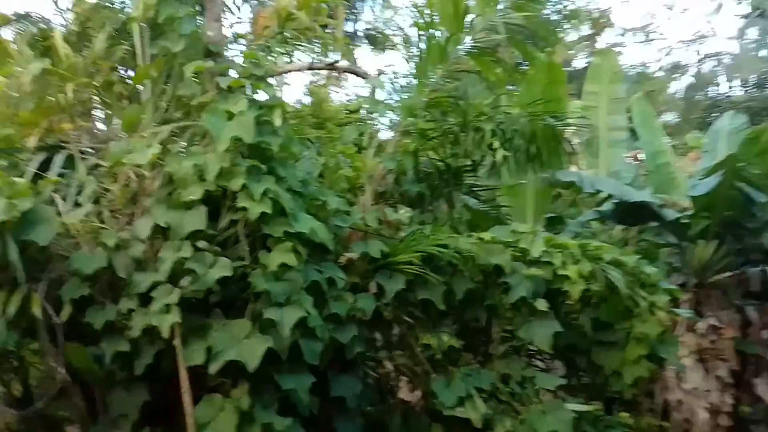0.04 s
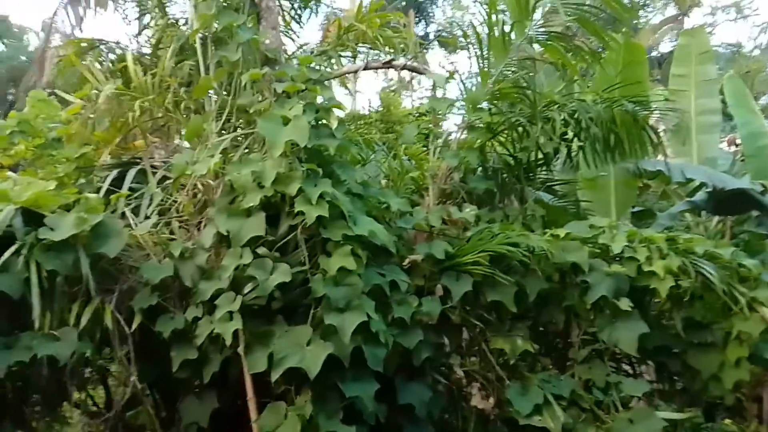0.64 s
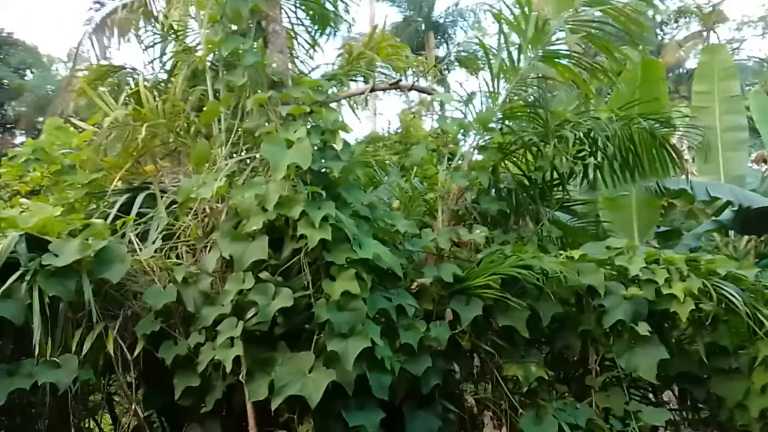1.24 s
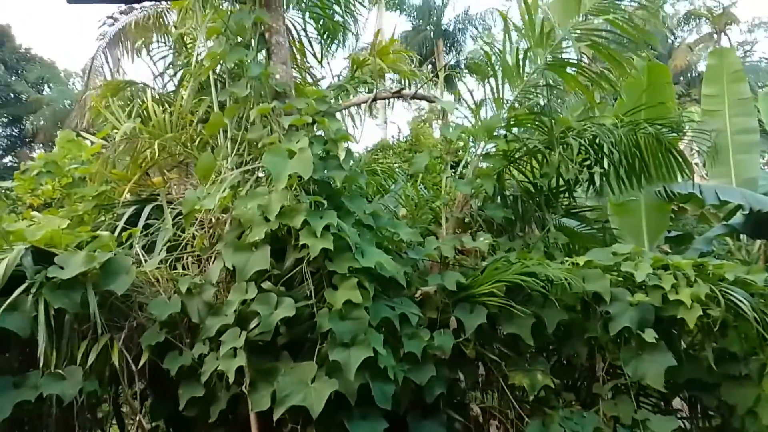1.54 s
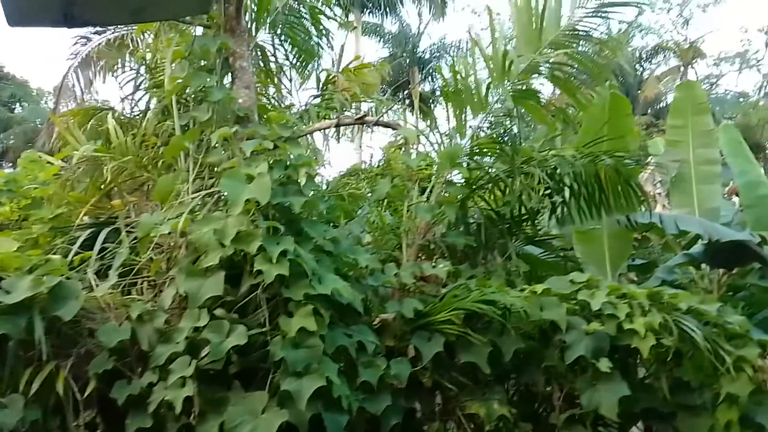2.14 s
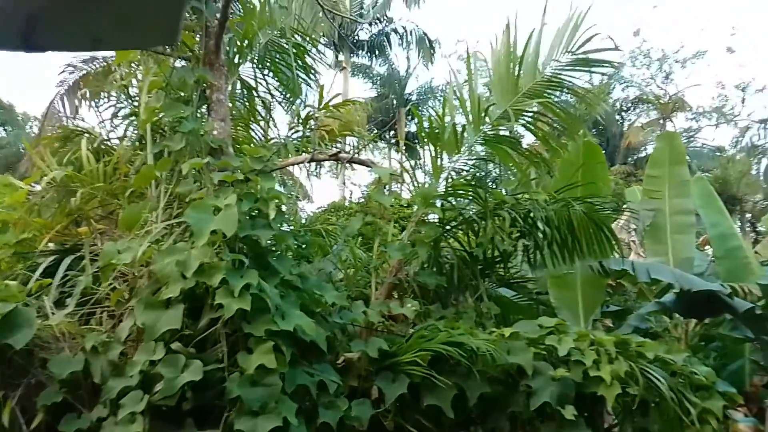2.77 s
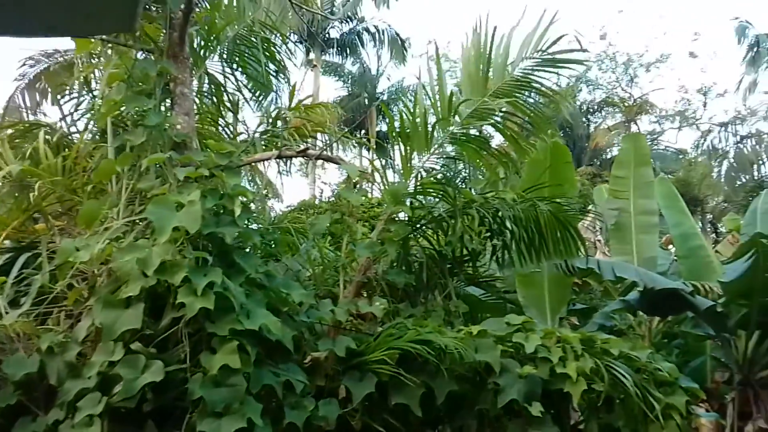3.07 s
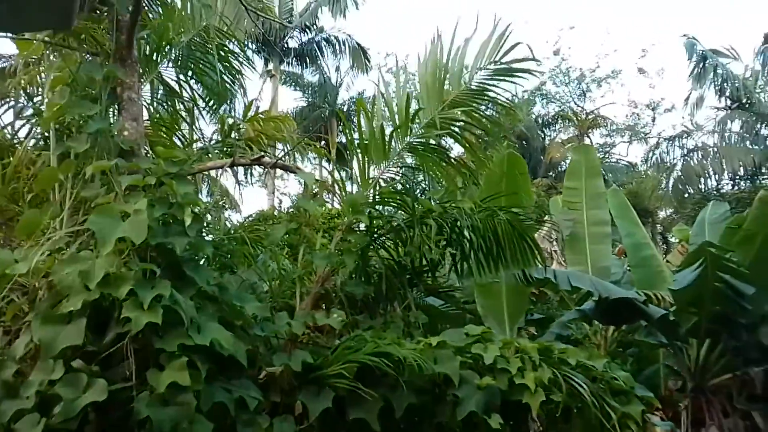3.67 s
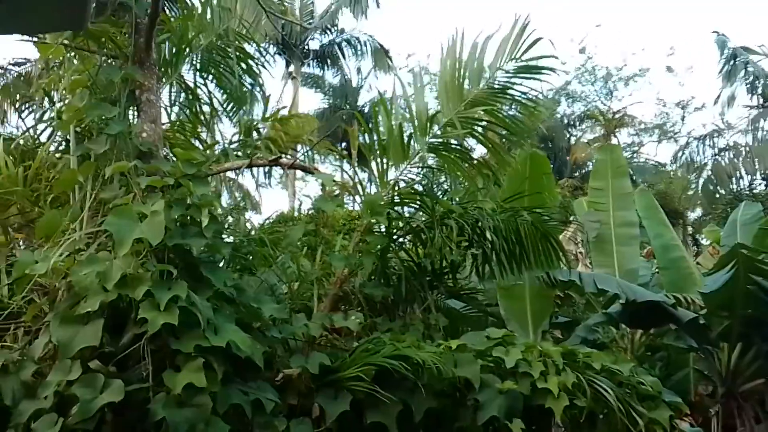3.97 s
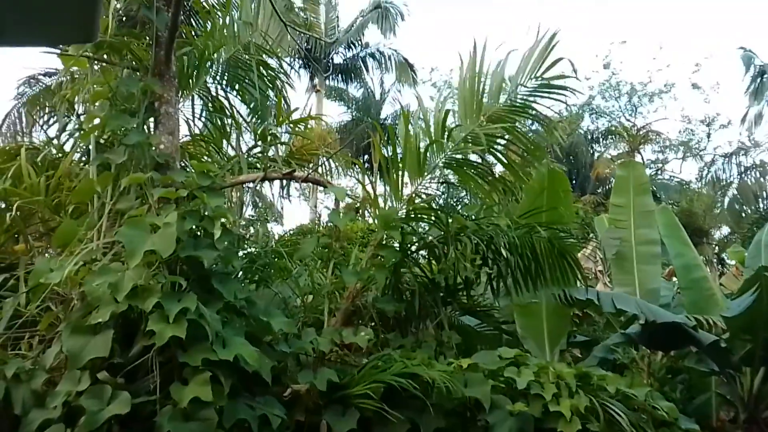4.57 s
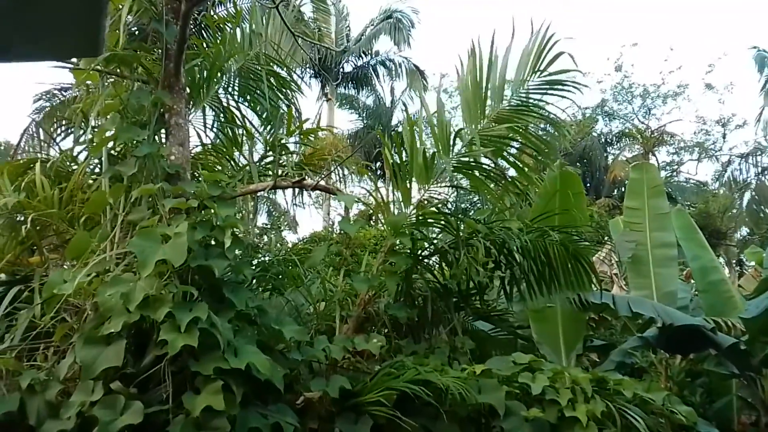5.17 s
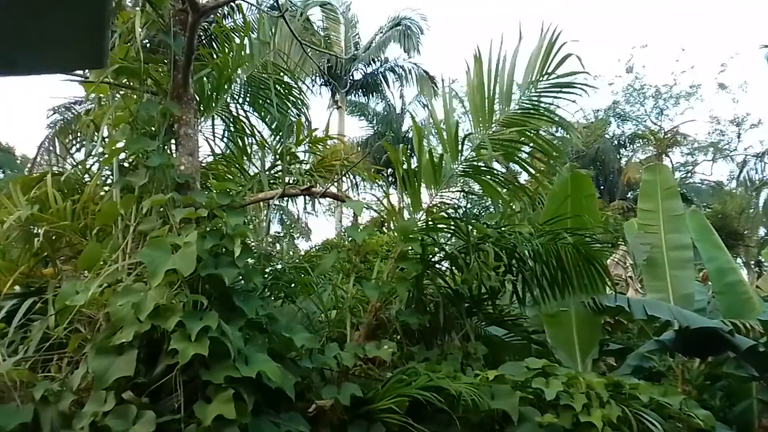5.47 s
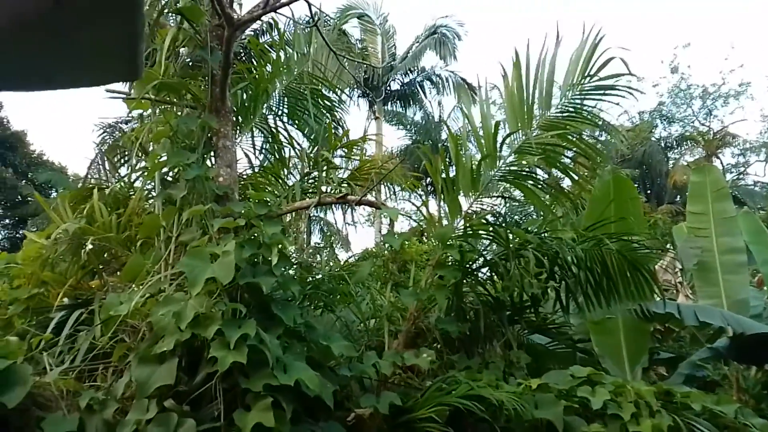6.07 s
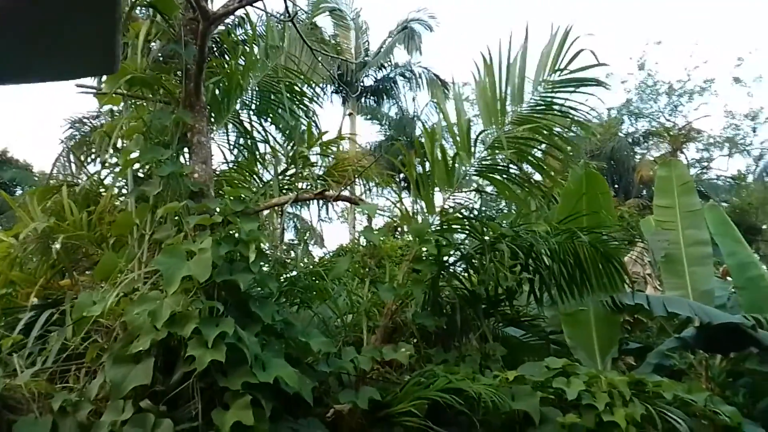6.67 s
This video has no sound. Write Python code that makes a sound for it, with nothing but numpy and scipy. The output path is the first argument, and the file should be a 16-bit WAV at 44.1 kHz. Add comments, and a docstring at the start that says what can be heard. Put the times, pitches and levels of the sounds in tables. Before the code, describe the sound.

A soft outdoor rumble and hiss run throughout in a leafy backyard. For the first 1.3 seconds, fingers make a cluster of short, dull knocks on the phone's case. From 1.4 to 5 seconds a farther bird gives faint, scattered high ticks. After a faint high buzz at 2.6 seconds, a nearer thrush sings a slurred whistle that dips and recovers at about 3 seconds. Two whistles climb and drop to a briefly held note, at 3.5 and 4.4 seconds, with a short, lower rising buzz and a faint finger scuff between them. From 5 seconds the thrush breaks into a quick, very high twitter of hooked, thin and buzzy notes, some overlapping, loudest around 5.3 to 5.5. Three sharper handling knocks land between 5.5 and 5.8 seconds. The song ends in a small rasp near 6.4 seconds, leaving the quiet background.

```python
"""A thrush sings one phrase in a leafy backyard: a low buzz and slurred whistles, then a high twitter
in which both sides of its syrinx sound at once. Each note is a self-sustained membrane oscillation,
reflected by a wall and scattered by foliage. A farther bird ticks; faint tones and blurred calls pass.
Fingers knock and scuff on a phone's damped case, over a soft outdoor rumble and hiss."""
import sys
import numpy as np
from scipy import signal
from scipy.fft import rfft, irfft, next_fast_len
from scipy.io import wavfile
from scipy.ndimage import uniform_filter1d, minimum_filter1d, map_coordinates

SR = 44100
rng = np.random.default_rng(int(sys.argv[2]) if len(sys.argv) > 2 else 0)


def log_audio(samples):
    """Write samples as a 16-bit WAV file to the path given in sys.argv[1]."""
    # one column per channel
    frames = np.atleast_2d(samples).T
    # limit to full scale, then quantise
    limited = np.clip(frames, -1, 1)
    pcm = np.round(limited * 32767).astype(np.int16)
    wavfile.write(sys.argv[1], SR, pcm)


N = 300791
T = np.arange(N) / SR

# strength of a bird's harmonics by where they fall: (f/Hz, level/dB re the fundamental)
HARMONICS = [(5000, -43), (6300, -30), (8200, -11), (9500, -23), (11000, -17.5), (13000, -40.5),
             (15500, -33)]


def amp(db):
    """Amplitude ratio of a level in decibels."""
    return 10 ** (np.asarray(db) / 20)


def unit(x):
    """Normalisation to rms 1."""
    return x / np.sqrt(np.mean(x ** 2) + 1e-20)


def along(points, hz):
    """Interpolation of (f/Hz, value) points on a logarithmic frequency axis."""
    f, values = np.transpose(points)
    return np.interp(np.log(hz + 1), np.log(f), values)


def curves(rows, t):
    """Linear interpolation, at the times t, of each column after the first."""
    times, *columns = np.transpose(rows)
    return [np.interp(t, times, column) for column in columns]


def wobble(rate, size):
    """Slow random modulation: a spline through rate knots a second."""
    return map_coordinates(rng.standard_normal(int(size * rate / SR) + 4), [np.arange(size) * rate / SR])


def add(track, s, x):
    """Superposition of x on the track from time s on."""
    part = track[max(0, round(s * SR)):][:len(x)]
    part += x[:len(part)]


def span(s, length):
    """The sample times that a note covers."""
    return s + np.arange(int(length * SR)) / SR


def during(x, t):
    """The stretch of x under the times t."""
    return x[round(t[0] * SR):][:len(t)]


def noise(colour, patchy_db):
    """Spectral shaping: noise of rms 1, coloured by (f/Hz, level/dB) points and drifting patches."""
    hz, _, spectrum = signal.stft(rng.standard_normal(N), SR, nperseg=2048)
    patches = uniform_filter1d(rng.standard_normal(spectrum.shape), size=16, axis=0)
    patches = unit(uniform_filter1d(patches, size=4, axis=1))
    gain = amp(along(colour, hz)[:, None] + patchy_db * patches)
    return unit(signal.istft(spectrum * gain, nperseg=2048)[1][:N])


def outdoors(air_gain_db, air_db=-60, rumble_trim_db=2.5, hiss_trim_db=1):
    """Incoherent noises add in power: distant rumble, air in the leaves and a narrow high hiss."""
    # envelopes of the rumble and hiss: (t/s, level/dB before the trim)
    rumble_levels = [(0.0, -57.5), (0.19, -68.5), (0.32, -68.5), (0.51, -65), (1.21, -68.5), (1.4, -65),
                     (2.09, -77.5), (2.3, -74), (2.53, -65.5), (3.04, -68.5), (3.15, -66.5), (4.37, -67),
                     (4.84, -72), (5.76, -68), (5.89, -69), (6.82, -68.5)]
    hiss_levels = [(0.0, -66), (0.74, -61.5), (1.27, -59.5), (1.46, -67), (2.37, -76), (2.55, -71.5),
                   (2.74, -67), (2.97, -61), (3.1, -58.5), (3.37, -64.5), (4.54, -69), (4.9, -65)]
    # spectra of the three noises: (f/Hz, relative level/dB)
    rumble_colour = [(25, -14), (60, -29), (100, 3), (140, -2.5), (220, 1.5), (340, -3), (450, -5.5),
                     (600, -14), (900, -20.5), (1500, -38.5), (2500, -104.5)]
    air_colour = [(200, -16.5), (450, 0), (900, -3), (1200, -5.5), (2000, -1.5), (3500, -5.5), (4800, -9.5),
                  (7000, -1), (9500, -11.5), (11000, -20), (13500, -14.5), (15800, -14.5)]
    hiss_colour = [(3000, -76), (5000, -31), (6000, -16), (6600, -5), (7500, 4.5), (8200, -2.5),
                   (9000, -23.5), (11000, -19), (15800, -25)]
    rumble_db, = curves(rumble_levels, T)
    hiss_db, = curves(hiss_levels, T)
    rumble = amp(rumble_db + rumble_trim_db) * noise(rumble_colour, patchy_db=2.5)
    air = amp(air_db + air_gain_db) * noise(air_colour, patchy_db=0.43)
    hiss = amp(hiss_db + hiss_trim_db) * noise(hiss_colour, patchy_db=2.5)
    return rumble + air + hiss


def far_calls(width=0.22):
    """Multiple scattering blurs each distant call into a soft band of noise."""
    # distant calls: (t/s, length/s, centre f/Hz, level/dB)
    murmurs = [(0, 0.17, 1950, -73), (1.13, 0.31, 1920, -72), (1.624, 0.19, 1380, -78)]
    calls = np.zeros(N)
    for s, length, hz, db in murmurs:
        band = [(hz * (1 + k * width), level) for k, level in enumerate([-60, -8, 0, -8, -60], -2)]
        envelope = np.exp(-((T - s) / length * 2 - 1) ** 4)
        calls += amp(db) * envelope * noise(band, patchy_db=4.5)
    return calls


def ring(t, hz, t60):
    """Free vibration of one damped mode."""
    return np.sin(2 * np.pi * hz * t) * amp(-60 * t / t60)


def knocks(soft_hz=473, hard_hz=741, soft_click_db=-40, hard_click_db=6):
    """Impact excitation: the damped case rings briefly; harder knocks ring higher and add a click."""
    # fingers striking the case: (t/s, level/dB, hardness 0-1)
    impacts = [(.037, -34.5, 0.35), (.065, -34, 0.2), (.079, -43.5, 0.3), (.108, -40.5, 0.5),
               (.138, -44, 0.4), (0.4, -34, 0), (.497, -29, 0.76), (0.5241, -26, 0.88),
               (0.5511, -27.5, 0.88), (.5941, -27, 1), (.883, -29.5, 0.42), (.92, -31, 0.4),
               (.976, -31, 0.3), (1.211, -35.5, 0), (1.271, -39, 0.6), (1.294, -34.5, 0),
               (1.415, -47.5, .1), (1.593, -49, 0), (3.538, -41, 0), (3.613, -41.5, .2), (4.274, -38, 0),
               (4.353, -37, .1), (5.4807, -22.5, 0.88), (5.6925, -26.5, 0.84), (5.773, -20.5, 0.82)]
    case = np.zeros(N)
    t = np.arange(SR // 20) / SR
    soft_skin = signal.butter(4, 1150, fs=SR, output="sos")
    # the fingertip slips twice, more softly, after each knock
    slips = [(s + rng.uniform(0.012, 0.082), min(db - 13.5, -45), hardness / 2)
             for s, db, hardness in impacts for _ in range(2)]
    for s, db, hardness in impacts + slips:
        hz = soft_hz + (hard_hz - soft_hz) * hardness + rng.normal(0, 42)
        thump = amp(-12) * ring(t, hz=290, t60=0.0075)
        body = (3.93 * ring(t, hz, t60=0.0052) + thump) * (1 - np.exp(-t / 0.00074))
        crack = amp(-19 - 60 * t / .006) * rng.standard_normal(len(t))
        click_db = soft_click_db + (hard_click_db - soft_click_db) * hardness
        click = amp(click_db) * (crack - ring(t, hz=2050, t60=0.0036))
        add(case, s, amp(db) * (signal.sosfilt(soft_skin, body) + click))
    # it also drags just before and after the knock
    drag = sum(amp(db - 19 - 60 * np.abs(T - s) / 0.035) for s, db, _ in impacts)
    drag_colour = [(90, -38), (200, 7), (600, -3), (1000, -2), (1500, -12), (4000, -25)]
    return case + drag * noise(drag_colour, patchy_db=3.5)


def syrinx(hz, db, overtones, jitter, flutter_db, count=2, full_db=-120):
    """Self-sustained oscillation: an unsteady, nearly pure tone whose overtones fade below full_db."""
    size = len(hz)
    hz = uniform_filter1d(hz, size=160, mode="nearest") * (1 + jitter * wobble(354.8, size))
    phase = 2 * np.pi * np.cumsum(hz) / SR
    tone = np.sin(phase)
    fade_db = np.minimum(db - full_db, 0) / 2
    for k in range(2, count + 1):
        tone += amp(along(overtones, k * hz) + fade_db) * np.sin(k * phase) * (k * hz < SR / 2)
    edges = signal.windows.tukey(size, min(1, 0.0091 * SR / size))
    return np.sqrt(2) * tone * edges * amp(db + flutter_db * wobble(117.5, size))


def garden(x, direct_db, near_db, leaves_db, wall_delay_s=.012, wall_db=-4):
    """Multipath propagation: direct sound, a wall echo, scatter from near leaves and a diffuse tail."""
    # reverberation time of the yard: (f/Hz, t60/s)
    decay_times = [(500, 0.12), (3000, 0.4), (6000, 0.43), (9000, 0.44), (15000, 0.26)]
    hz, t, spectrum = signal.stft(rng.standard_normal(SR * 3 // 4), SR, nperseg=256)
    decay = amp(-60 * t / along(decay_times, hz)[:, None])
    tail = signal.istft(spectrum * decay, SR, nperseg=256)[1]
    age = np.arange(len(tail)) / SR
    tail *= 1 - np.exp(-age / 0.0035)
    near = rng.standard_normal(len(age)) ** 3 * amp(-60 * age / .19) * (age > .003)
    response = amp(leaves_db) * tail / np.linalg.norm(tail) + amp(near_db) * near / np.linalg.norm(near)
    response[0] += amp(direct_db)
    # a gliding note beats against its own echo
    response[int(wall_delay_s * rng.uniform(.9, 1.1) * SR)] += amp(direct_db + wall_db)
    return signal.fftconvolve(x, response)


def ticks_and_tones(tick_s=0.026, fall_share=.22):
    """Scattering by foliage softens a farther bird's downward chirps, and three faint level tones."""
    # the farther bird's falling ticks: (t/s, starting f/Hz, level/dB)
    ticks = [(1.415, 7700, -57.5), (1.655, 7900, -56.5), (1.905, 8030, -54.5), (2.742, 6900, -56.5),
             (3.38, 7640, -54.5), (3.44, 6400, -55), (4.117, 7230, -52.5), (4.719, 7500, -54.5),
             (4.935, 7800, -56)]
    # faint tones; the last, at 5.5 kHz, lies under the thrush's two-voiced note:
    # (t/s, length/s, f/Hz, level/dB)
    faint_tones = [(1.95, 0.045, 5750, -73), (5.56, .06, 1880, -61.5), (5.97, .1, 5540, -65)]
    fall = 1 - fall_share * np.linspace(0, 1, int(tick_s * SR)) ** 2
    notes = [(s, hz * fall, db) for s, hz, db in ticks]
    notes += [(s, np.full(int(length * SR), hz), db) for s, length, hz, db in faint_tones]
    track = np.zeros(N)
    for s, hz, db in notes:
        add(track, s, syrinx(hz, db, HARMONICS, jitter=.008, flutter_db=2))
    return garden(track, direct_db=-4, near_db=-8, leaves_db=-7, wall_db=-10)[:N]


def buzzes(attack_s=0.024, release_s=0.017, edge_db=-13, rasp_db=-8):
    """Frequency modulation: the thrush's pitch swings about a hundred times a second and buzzes."""
    # buzzes: (t/s, length/s, first centre f/Hz, last centre f/Hz, level/dB, nominal swing/Hz, rate/Hz)
    notes = [(2.551, 0.19, 7350, 6490, -54.5, 480, 120), (3.882, 0.13, 2038, 1765, -53, 139, 95),
             (4.014, 0.093, 2300, 2987, -42.5, 470, 125), (4.961, 0.09, 7600, 6300, -38, 950, 105),
             (5.012, 0.026, 3060, 3000, -58.5, 228, 130), (5.067, 0.048, 6190, 6000, -38, 730, 115),
             (5.735, 0.12, 7850, 7500, -32, 1954, 57), (5.764, 0.1, 3030, 3430, -46.5, 240, 115)]
    # spectrum of the membranes' rasp: (f/Hz, relative level/dB)
    rasp_colour = [(2400, -33), (3300, 3.5), (4300, -0.5), (6000, 7), (8000, 1), (10000, -3.5), (15000, -5)]
    song = np.zeros(N)
    rasp = noise(rasp_colour, patchy_db=1.5)
    for s, length, first_hz, last_hz, level_db, swing_hz, rate in notes:
        t = span(s, length)
        centre_hz = np.linspace(first_hz, last_hz, len(t))
        rise = np.minimum((t - s) / attack_s, (t[-1] - t) / release_s)
        db = level_db + edge_db * (1 - np.minimum(rise, 1))
        swing = -np.cos(2 * np.pi * rate * (t - s))
        tone = syrinx(centre_hz + swing_hz * swing, db, HARMONICS, jitter=.03, flutter_db=5)
        # driven high and hard, the membranes break into a broad rasp on each swing
        strain = np.clip(centre_hz / 3000 - 1, 0, 1) * np.clip((db + 50) / 12, 0, 1)
        tone += amp(db + rasp_db) * strain * (1 - .5 * swing) * during(rasp, t)
        add(song, s, garden(tone, direct_db=-6.5, near_db=-9, leaves_db=-9.5))
    return song


def snaps(t60=0.068):
    """Broadband transients with exponential decay, heard as tiny bright clicks."""
    # clicks: (t/s, level/dB)
    clicks = [(2.714, -51), (3.133, -43.5)]
    envelope = sum(amp(db - 60 * np.abs(T - s) / t60) * (T > s) for s, db in clicks)
    return envelope * noise([(1500, -25), (4000, -12), (7500, 3), (15000, -18)], patchy_db=2)


def glide(s, length, from_hz, to_hz, db, settle_s, swell_db=0, dive_hz=0, dive_s=.004):
    """Exponential relaxation onto a pitch, with an optional closing dive: times, pitch and level."""
    t = span(s, length)
    hz = to_hz + (from_hz - to_hz) * np.exp((s - t) / settle_s) - dive_hz * np.exp((t - t[-1]) / dive_s)
    return t, hz, db + swell_db * ((t - s) / length - .5)


def slurs(slur_husk_db=-17, arch_husk_db=-22, drop_delay_s=.144, drop_hz=(4250, 3012)):
    """Harmonics arise with drive: a pure but husky slur, then two arches forced into overtones."""
    # a slur that dips and recovers: (t/s, f/Hz, level/dB)
    contour = [(2.93, 3600, -57), (2.96, 3388, -37), (2.99, 3321, -32), (3.03, 2700, -37.5),
               (3.055, 2478, -39), (3.09, 2435, -39.5), (3.13, 2730, -36), (3.2, 2947, -43)]
    # arches that climb, then drop to a held note: (t/s; the drop's level/dB, settling/s, length/s, swell/dB)
    arches = [(3.5, -29, .0095, .096, -2), (4.351, -31, .018, 0.0787, 2)]
    # steps of each climb: (delay/s, length/s, starting f/Hz, target f/Hz, level/dB re the drop)
    steps = [(0, .054, 2275, 3284, -11), (0.059, 0.0608, 3707, 4190, -5.5),
             (0.101, .034, 4500, 5210, -16.5)]
    # spectrum of the husky noise: (f/Hz, relative level/dB)
    husk_colour = [(1500, -30), (3500, 3), (5500, -3), (9500, 4.5), (11500, -12), (14500, -3.5),
                   (16000, -44)]
    husk = noise(husk_colour, patchy_db=2)
    t = span(2.93, .27)
    hz, db = curves(contour, t)
    tone = syrinx(hz, db, HARMONICS, jitter=.004, flutter_db=1.6, count=1)
    notes = [(t, tone + amp(db + slur_husk_db) * during(husk, t))]
    for s, level_db, settle_s, drop_s, swell_db in arches:
        climb = [glide(s + delay, length, from_hz, to_hz, level_db + db, settle_s=.021, swell_db=8.5)
                 for delay, length, from_hz, to_hz, db in steps]
        drop = glide(s + drop_delay_s, drop_s, *drop_hz, level_db, settle_s, swell_db)
        for (t, hz, db), jitter in [(step, .022) for step in climb] + [(drop, .012)]:
            tone = syrinx(hz, db, HARMONICS, jitter, flutter_db=3.4, count=3, full_db=-25.5)
            notes.append((t, tone + amp(db + arch_husk_db) * during(husk, t)))
    song = np.zeros(N)
    for t, tone in notes:
        add(song, t[0], garden(tone, direct_db=-4, near_db=-8.5, leaves_db=-8))
    return song


def scuffs():
    """Sliding friction: skin brushes the case in brief swells of noise."""
    # strokes of skin: (t/s, length/s, level/dB)
    strokes = [(3.892, 0.11, -52.5), (6.149, 0.069, -50)]
    # friction spectrum: (f/Hz, relative level/dB)
    colour = [(100, -19), (400, 3.5), (900, 1), (1400, -4), (2200, 7), (5000, -3), (7500, 0.5), (10000, -7),
              (15000, -20)]
    envelope = sum(amp(db) * np.exp(-((T - s) / length * 2 - 1) ** 2) for s, length, db in strokes)
    return envelope * noise(colour, patchy_db=1.5)


def twitter(ledge_share=.935, climb_share=.87, loss_db_per_hz=0.03, breath_db=-20):
    """Two independent oscillators: loud hooks and thin notes, at times from both sides of the syrinx."""
    # hooks rest on a ledge, swell to a top and dive:
    # (t/s, ledge length/s, top length/s, entry f/Hz, top f/Hz, level/dB, dive/Hz)
    hooks = [(5.106, .036, .061, 9860, 9440, -31, 500), (5.254, .025, .072, 7210, 8740, -21, 3630),
             (5.394, 0.023, .072, 6990, 8360, -20, 3710)]
    # thin sliding notes: (t/s, length/s, entry f/Hz, held f/Hz, dive/Hz, level/dB, swell/dB)
    thin_notes = [(5.063, 0.03, 5640, 6970, 599, -37.5, 0.5),
                  (5.542, 0.048, 8700, 6920, 1791.5, -31.5, -4.5),
                  (5.638, 0.053, 7860, 6580, 1605, -31.5, 6), (5.929, 0.18, 8720, 7364, 2, -37, -6.5),
                  (5.93, 0.086, 9970, 8964, 0, -36.5, -2), (6.023, .058, 8850, 9440, -4, -39, -6),
                  (6.34, 0.039, 7640, 8280, 7, -37.5, -5), (6.358, 0.04, 6110, 5930, 1704, -33, -15.5),
                  (6.401, 0.025, 4620, 3560, 396.5, -39.5, -4)]
    # second harmonic at full voice: (f/Hz, level/dB re the fundamental)
    overtones = [(10500, -18), (12000, -19), (13500, -14), (15000, -18.5), (16000, -50)]
    breath_colour = [(4000, -36), (5500, -18.5), (7000, -10.5), (8600, 6), (9600, -22), (11000, -48.5)]
    breath = noise(breath_colour, patchy_db=8)
    song, notes = np.zeros(N), []
    for s, ledge_s, top_s, entry_hz, top_hz, db, dive_hz in hooks:
        notes.append(glide(s, ledge_s + 0.0063, entry_hz, ledge_share * top_hz, db - 8,
                           settle_s=0.0035, swell_db=10.5, dive_hz=1100))
        t, hz, top_db = glide(s + ledge_s, top_s, climb_share * top_hz, top_hz, db,
                              settle_s=.0075, swell_db=-2, dive_hz=dive_hz, dive_s=.0048)
        notes.append((t, hz, top_db - loss_db_per_hz * (top_hz - hz)))
    for s, length, entry_hz, held_hz, dive_hz, db, swell_db in thin_notes:
        notes.append(glide(s, length, entry_hz, held_hz, db,
                           settle_s=.0055, swell_db=swell_db, dive_hz=dive_hz, dive_s=.007))
    for t, hz, db in notes:
        tone = syrinx(hz, db, overtones, jitter=.0045, flutter_db=1.8, full_db=-28)
        tone += amp(db + breath_db) * during(breath, t)
        # the head turns, so each note scatters anew
        add(song, t[0], garden(tone, direct_db=-3, near_db=-7.5, leaves_db=-6))
    return song


def last_rasp(s=6.378, level_db=-40, t60=0.2):
    """Aperiodic vibration: the closing note breaks into a decaying rasp as it dives."""
    colour = [(3000, -17), (5000, 1), (8000, 2), (11500, 2), (14000, -5), (15500, -30.5)]
    burst = amp(level_db - 60 * np.abs(T - s) / t60) * (T > s) * noise(colour, patchy_db=0.5)
    return garden(burst, direct_db=-4.5, near_db=-5.5, leaves_db=-7.5)[:N]


def suppressor(x, key_hz=(1500, 3690), open_db=-47.5, depth_db=15.5, hold_s=0.075, close_db_per_s=23):
    """Noise gating: the phone's gain in dB for the faint air opens on loud midrange, holds and sinks."""
    key = signal.sosfilt(signal.butter(4, key_hz, "bandpass", fs=SR, output="sos"), x)
    level_db = 10 * np.log10(np.abs(uniform_filter1d(key ** 2, size=220)) + 1e-14)
    cut_db = np.clip(open_db - level_db, 0, depth_db)
    hold = int(hold_s * SR) // 2 * 2 + 1
    held_db = minimum_filter1d(cut_db, hold, origin=hold // 2, mode="nearest")
    return np.maximum.accumulate(close_db_per_s * T - held_db) - close_db_per_s * T


def scene():
    """Superposition at one microphone; song and knocks open the gate and draw the air up with them."""
    thrush = slurs() + twitter() + buzzes() + last_rasp()
    events = thrush + ticks_and_tones() + far_calls() + knocks() + scuffs() + snaps()
    return (events + outdoors(suppressor(events)))[None]


def record(dry):
    """Linear filtering: the microphone's bass cut, the dip of its port and the phone's band limit."""
    bass_cut_hz, port_hz, top_hz = 153, 1460, 15850
    dry = signal.sosfilt(signal.butter(4, bass_cut_hz, "highpass", fs=SR, output="sos"), dry)
    dry = dry - 0.54 * signal.lfilter(*signal.iirpeak(port_hz, Q=3.5, fs=SR), dry)
    size = next_fast_len(N + 8192)
    passband = np.fft.rfftfreq(size, 1 / SR) < top_hz
    return irfft(rfft(dry, size) * passband, size)[:, :N]


dry = scene()
out = record(dry)
log_audio(out)
```